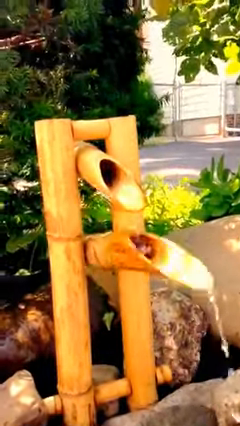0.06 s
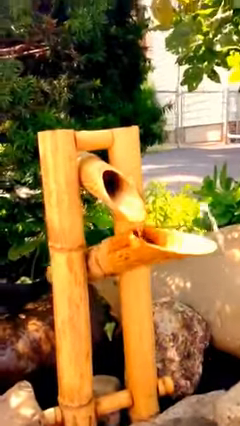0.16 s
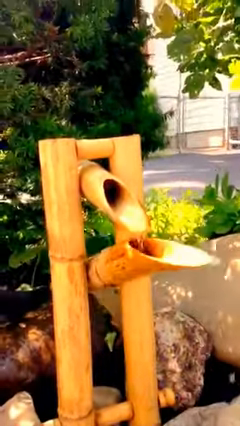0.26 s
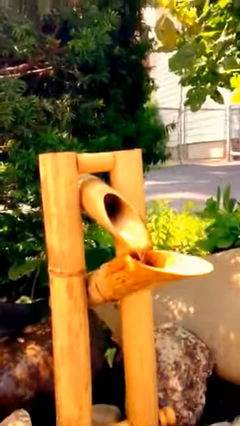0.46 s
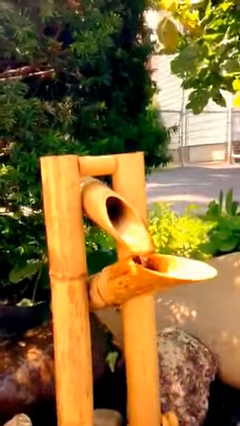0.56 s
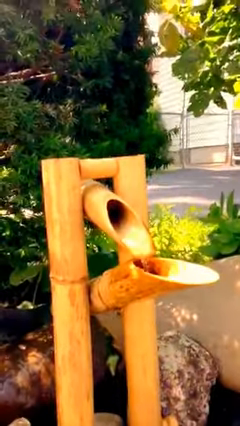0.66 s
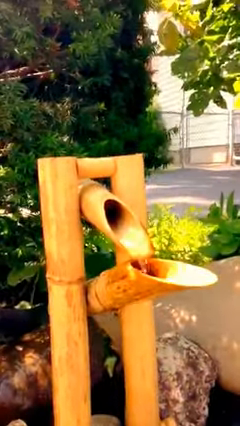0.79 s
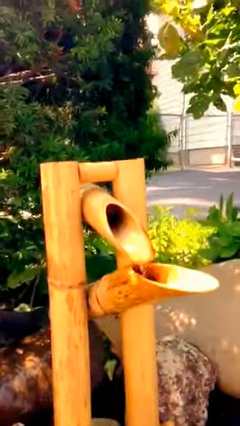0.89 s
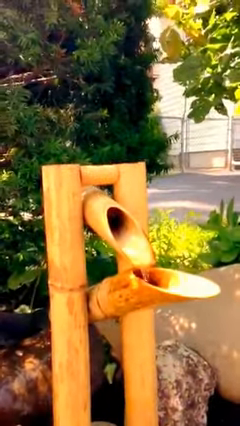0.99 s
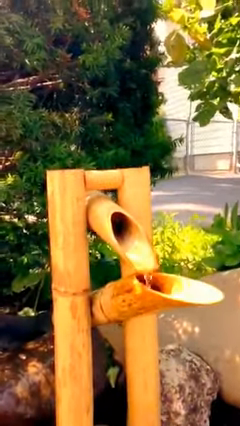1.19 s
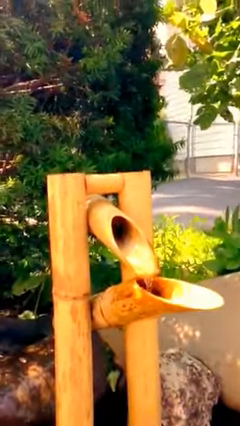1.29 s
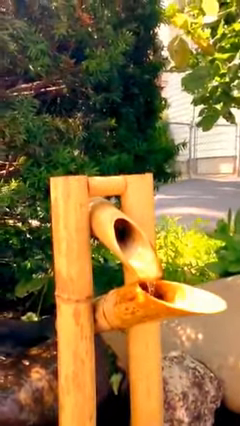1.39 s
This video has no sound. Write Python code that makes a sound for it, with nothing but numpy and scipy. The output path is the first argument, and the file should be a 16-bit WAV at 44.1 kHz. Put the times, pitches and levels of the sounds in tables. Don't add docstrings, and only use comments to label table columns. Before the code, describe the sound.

One hard, dry bamboo clack with a tiny squeaky rattle, then soft dripping and trickling

```python
import sys
import numpy as np
from scipy import signal
from scipy.io import wavfile
from scipy.ndimage import uniform_filter1d

SR = 44100
rng = np.random.default_rng(int(sys.argv[2]) if len(sys.argv) > 2 else 0)


def to_wav(sig):
    pcm = np.clip(np.atleast_2d(sig), -1, 1) * 32767
    pcm = np.round(pcm).astype(np.int16)
    wavfile.write(sys.argv[1], SR, pcm.T)


def gain_from_db(level_db):
    decades = np.asarray(level_db, float) / 20
    return 10 ** decades


N = 63945

# t/s, force/dB, hardness/Hz
FOOT_CONTACTS = [(.2125, -12, 7000), (.2141, -5, 7000), (.2176, -6, 3500), (.2211, -11, 4240),
                 (.2248, -16, 3500), (.2272, -18, 3500), (.2320, -21, 3000), (.2415, -26, 2490),
                 (.2490, -36, 2450), (.4062, -34, 2500), (.4083, -28, 1800), (.4325, -22, 560),
                 (.4362, -25, 800), (.4458, -36, 2520), (.4495, -33, 880)]
# f/Hz, level/dB, t60/s
TUBE_MODES = [(212, -9, 0.033), (372, -10.5, 0.036), (596.4, -7.5, .05), (790, -9.5, 0.028),
              (854.7, 6, 0.034), (1136, -7, 0.049), (1333, -4, 0.036), (1442, -4.5, 0.032),
              (1714, -4.5, 0.053), (2142, -3.5, 0.057), (2940, -0.5, 0.022), (3630, -4, .033),
              (4780, 6.5, 0.0081), (6000, -26.5, .012)]
# t/s, level/dB
PIVOT_CHATTERS = [(.2254, -16), (.2310, -22), (.2385, -25.5), (0.243, -32), (.2465, -23), (.2495, -29),
                  (0.2517, -22.5), (.2588, -27.5), (.2610, -17.5), (0.264, -28), (0.269, -28), (.2750, -34),
                  (0.28, -24)]
# f/Hz, level/dB, t60/s
PIVOT_MODES = [(3100, -22, 0.0268), (3525, -6, 0.027), (4050, -6.5, 0.0089), (5000, -30, 0.026)]
# t/s, peak/dB, f/Hz, t60/s
AXLE_SQUEAKS = [
    (.2400, -32, 3520, 0.058),
    (.2500, -35, 3530, 0.027),
    (.2588, -26.5, 3447, 0.036),
    (.2588, -21.5, 3004, 0.019),
    (.2700, -43, 3447, 0.062),
]
# t/s, peak/dB, centre f/Hz, broad part/dB
DROP_SPLATS = [(0.0298, -42.5, 8000, 2), (0.0573, -41.5, 14660, -10), (0.0817, -50, 6190, -9),
               (0.1052, -48, 7570, -6), (0.1264, -57, 8080, -5), (0.1394, -54, 14300, -7),
               (0.1516, -44, 8700, -7), (0.182, -37, 6300, -7), (0.1864, -38, 6350, -7),
               (0.3331, -38, 10350, -7), (0.3384, -41, 11800, -3), (0.3556, -37, 8300, -7),
               (0.382, -57, 7370, -15), (0.3864, -34.5, 7950, 6), (0.4469, -35, 10300, -21),
               (0.4514, -45, 11100, -12), (0.4624, -41, 9250, -7), (0.4948, -17, 9350, -2.5),
               (0.5014, -26, 8300, 2), (0.5154, -27, 8250, -3), (0.5457, -40.5, 6060, -3),
               (0.5524, -38, 6360, 3), (0.5726, -37.5, 8010, 3), (0.5824, -49, 8650, -17),
               (0.6285, -58, 7410, 1), (0.6784, -43, 6000, -15), (0.6883, -30, 10350, 1),
               (0.6944, -36, 10600, -2), (0.7054, -36, 10000, 7), (0.7327, -42.5, 6310, -5),
               (0.7814, -40, 8650, -5), (0.8091, -51, 7500, -9), (0.831, -55, 7130, -5),
               (0.8784, -32, 13300, 12), (0.8829, -18.5, 13040, -3.5), (0.9208, -48, 12130, -4),
               (0.9208, -36.5, 6000, 2), (0.9404, -45, 12900, -7), (1.0829, -46, 9800, -10),
               (1.1338, -44, 8900, 7), (1.1648, -27.5, 13000, -6), (1.1932, -25, 9240, 3),
               (1.2351, -45, 10400, -5), (1.2545, -42, 8400, 15), (1.3109, -41.5, 9300, -7),
               (1.3284, -42.5, 8130, -14), (1.3578, -43, 9410, -7), (1.3748, -51, 9450, -5),
               (1.3912, -42, 9440, -7), (1.4152, -43, 5800, -38)]
# t/s, peak/dB, f/Hz, t60/s
SMALL_BUBBLES = [(.0323, -45, 2710, 0.044), (.0653, -47, 2910, 0.032), (.1062, -43, 5470, 0.024),
                 (.1184, -42, 7640, 0.014), (.1271, -45, 2490, 0.08), (.1401, -40, 2130, 0.035),
                 (.1415, -41.5, 3640, 0.019), (.1825, -40, 2860, 0.024), (.2734, -37.5, 6450, 0.017),
                 (.3341, -38.5, 4060, 0.015), (.4584, -44, 5570, 0.016), (.4693, -40.5, 2780, 0.021),
                 (.4850, -42, 5970, 0.026), (.4865, -41, 4050, 0.022), (.5457, -51, 4260, 0.1),
                 (.6419, -47, 7370, 0.031), (.6784, -47, 4430, 0.023), (.6913, -41, 3920, 0.013),
                 (.7058, -40.5, 4050, 0.021), (.7711, -43.5, 6460, 0.013), (.7816, -41, 4350, 0.016),
                 (.9208, -41, 2200, 0.011), (1.0256, -45.5, 3060, 0.03), (1.1937, -45.5, 3390, 0.032),
                 (1.2074, -36, 3830, 0.0048), (1.274, -39, 4000, 0.019), (1.3009, -43, 2900, 0.009),
                 (1.3753, -44, 2710, 0.012), (1.409, -46.5, 3270, 0.091), (1.4152, -41, 6000, 0.031)]
# t/s, peak/dB, f/Hz, t60/s
LARGE_BUBBLES = [(.034, -41.5, 1330, 0.033), (.183, -36.5, 1410, 0.024), (.189, -41, 926, 0.042),
                 (.340, -43.5, 804, 0.073), (.388, -45.5, 832, 0.21), (.735, -43.5, 952, 0.056),
                 (.825, -43.5, 1366, 0.032), (.8845, -32.5, 839, 0.075), (1.115, -50, 943.7, 0.24),
                 (1.138, -44.5, 972, 0.072)]
# t/s, level/dB
TRICKLE_FLOW = [(0.0, -53), (0.214, -62), (0.35, -54.5), (0.48, -59.5), (0.976, -60.5), (1.45, -57)]
# f/Hz, density/dB per Hz
HISS_SPECTRUM = [(880, -33), (1500, 0), (2550, -6), (4140, -3), (6970, -20.5), (9470, -9), (14300, -28.5),
                 (15800, -2)]
# t/s, level/dB
HUM_SWELL = [(0.0, -55.5), (0.302, -52.5), (0.48, -59), (0.876, -59.5), (1.45, -57.5)]
# f/Hz, density/dB per Hz
HUM_SPECTRUM = [(40, -22), (70, -21), (110, -9), (180, -2), (250, -2.5), (330, -16.5), (500, -17)]
# f/Hz, density/dB per Hz
GARDEN_SPECTRUM = [(450, -26), (600, -5.5), (950, 1), (1500, -9.5), (2400, -21), (3500, -30)]


def tube():
    mode_scatter_db = 6.5
    settle_s, settle_db, settle_time_s = .2226, -12, .0015
    out, t = np.zeros(N), np.arange(SR // 4) / SR
    for s, force_db, hard_hz in FOOT_CONTACTS:
        push = butter(1. * (t == 0), hard_hz, "low")
        scatter_db = mode_scatter_db * rng.standard_normal(len(TUBE_MODES))
        noise = rng.standard_normal((2, len(t)))
        body = np.zeros(len(t))
        for (hz, mode_db, t60_s), extra_db in zip(TUBE_MODES, scatter_db):
            body += gain_from_db(mode_db + extra_db - 15) * ring(push, hz, t60_s)
        settled = np.clip((s + t - settle_s) / settle_time_s, 0, 1) * (s < settle_s)
        crack = butter(noise[0] * fade(t, .0098), [700, 6600], "band", order=1)
        crack = gain_from_db(-3.5) * butter(crack, 2 * hard_hz, "low")
        echo = gain_from_db(-26.5) * butter(noise[1] * fade(t, .19), [500, 4000], "band")
        add(out, s, gain_from_db(force_db) * (body * gain_from_db(settle_db * settled) + crack + echo))
    return out


def pivot():
    chatter_t60_s, buzz_db, buzz_smooth_s = .0055, -23.5, .004
    shake, t = np.zeros(N), np.arange(SR // 30) / SR
    for s, level_db in PIVOT_CHATTERS:
        add(shake, s, gain_from_db(level_db - 17.5) * fade(t, chatter_t60_s))
    noise = rng.standard_normal((2, N))
    chatter = noise[0] * shake
    buzz = noise[1] * uniform_filter1d(shake, int(buzz_smooth_s * SR))
    modes = sum(gain_from_db(mode_db) * ring(chatter, hz, t60_s) for hz, mode_db, t60_s in PIVOT_MODES)
    return modes + gain_from_db(buzz_db + 34) * butter(buzz, [4000, 11000], "band")


def squeaks():
    return bubbles(AXLE_SQUEAKS, attack_s=.0015, rise_per_s=0, wobble=.32)


def splats():
    attack_s, snap_t60_s, rise_s = .0003, .0026, .00051
    spray_db, spray_t60_s = -23, .045
    width, body_db, body_low_hz = .27, -4, 4000
    out, t = np.zeros(N), np.arange(SR // 12) / SR
    envelope = fade(t, snap_t60_s) + gain_from_db(spray_db) * fade(t, spray_t60_s)
    envelope = envelope * (1 - np.exp(-t / attack_s))
    for s, peak_db, hz, broad_db in DROP_SPLATS:
        burst = rng.standard_normal(len(t)) * envelope
        narrow = butter(burst, [hz * (1 - width / 2), hz * (1 + width)], "band")
        broad = gain_from_db(body_db + broad_db) * butter(burst, body_low_hz, "high", order=3)
        snap = narrow + broad
        add(out, s + rise_s, gain_from_db(peak_db) * snap / np.abs(snap).max())
    return out


def bubbles(table, attack_s, rise_per_s, wobble):
    out, t = np.zeros(N), np.arange(SR // 6) / SR
    for s, peak_db, hz, t60_s in table:
        shake = wobble * rms_one(butter(rng.standard_normal((2, len(t))), hz / 12, "low"))
        phase = 2 * np.pi * hz * t * (1 + rise_per_s * t / 2) + shake[1]
        tone = (1 + .5 * shake[0]) * np.sin(phase)
        add(out, s, gain_from_db(peak_db) * (1 - np.exp(-t / attack_s)) * fade(t, t60_s) * tone)
    return out


def trickle():
    fizz_db, ticks_db, hiss_db, hiss_flow_share = -61, -67, -4, .24
    s, db = np.transpose(TRICKLE_FLOW)
    swing_db = np.interp(np.arange(N) / SR, s, db - db.mean())
    fizz = dealt_rings(grains(320, spread_db=1), np.geomspace(1300, 9000, 24), cycles=23)
    ticks = dealt_rings(grains(700, spread_db=4.5), np.geomspace(3500, 14500, 14), cycles=24)
    drops = gain_from_db(fizz_db) * fizz + gain_from_db(ticks_db) * butter(ticks, 2000, "high")
    hiss_level = gain_from_db(db.mean() + hiss_db + hiss_flow_share * swing_db)
    return gain_from_db(swing_db) * drops + hiss_level * banded_noise(HISS_SPECTRUM, patchy_db=1.8)


def grains(rate_per_s, spread_db):
    sizes = gain_from_db(spread_db * np.minimum(rng.exponential(1, N), 4)) * rng.choice([-1, 1], N)
    return sizes * (rng.random(N) < rate_per_s * gain_from_db(4 * drift(12)) / SR)


def dealt_rings(clicks, pitches_hz, cycles):
    dealt, out = rng.integers(0, len(pitches_hz), N), np.zeros(N)
    for k, hz in enumerate(pitches_hz):
        once = ring(clicks * (dealt == k), hz, cycles / hz)
        out += hz * ring(once, hz, cycles / hz / 2)
    return rms_one(out)


def garden():
    hum_db, wash_db = -2.5, -60
    s, db = np.transpose(HUM_SWELL)
    hum_level = gain_from_db(hum_db + np.interp(np.arange(N) / SR, s, db))
    hum = hum_level * banded_noise(HUM_SPECTRUM, patchy_db=1.5)
    return hum + gain_from_db(wash_db) * banded_noise(GARDEN_SPECTRUM, patchy_db=1.5)


def banded_noise(spectrum, patchy_db):
    out, together = np.zeros(N), drift(3)
    edges_hz = 40 * 2 ** np.arange(0, 9, 1 / 3)
    white = rng.standard_normal((2, N))
    at_hz, db = np.transpose(spectrum)
    for k, (low, high) in enumerate(zip(edges_hz, edges_hz[1:])):
        level_db = np.interp(np.log(low * high) / 2, np.log(at_hz), db, left=-60, right=-60)
        flicker_db = patchy_db * (.5 * together + drift(19))
        out += gain_from_db(level_db + flicker_db) * butter(white[k % 2], [low, high], "band")
    return rms_one(out)


def drift(rate_hz):
    r = np.exp(-80 * np.pi * rate_hz / SR)
    slow = signal.lfilter([1], [1, -2 * r, r * r], rng.standard_normal(N // 40 + 2002))[2000:]
    return np.interp(np.arange(N) / 40, np.arange(len(slow)), rms_one(slow))


def ring(clicks, hz, t60_s):
    r, w = gain_from_db(-60 / (t60_s * SR)), 2 * np.pi * hz / SR
    return signal.lfilter([0, np.sin(w)], [1, -2 * r * np.cos(w), r * r], clicks + 1e-18)


def fade(t, t60_s):
    return np.exp(-np.log(1000) * t / t60_s)


def butter(x, hz, kind, order=2):
    edges_hz = np.clip(hz, 20, .45 * SR)
    return signal.sosfilt(signal.butter(order, edges_hz, kind, fs=SR, output="sos"), x)


def rms_one(x):
    return x / np.sqrt(np.mean(x ** 2) + 1e-20)


def add(out, s, grain):
    i = int(s * SR)
    out[i:i + len(grain)] += grain[:N - i]


def scene():
    small = bubbles(SMALL_BUBBLES, attack_s=.00012, rise_per_s=5.3, wobble=.45)
    large = bubbles(LARGE_BUBBLES, attack_s=.00122, rise_per_s=.62, wobble=.2)
    knock = butter(tube(), 205, "high", order=4)
    mix = knock + pivot() + splats() + small + large + trickle() + garden() + squeaks()
    return mix[None]


def low_pass(x):
    return signal.sosfilt(signal.butter(12, 16490, fs=SR, output="sos"), x)


def record(dry):
    bass_cut = butter(dry, 93, "high")
    top_cut = signal.cheby2(10, 35, 15900, fs=SR, output="sos")
    mix = signal.sosfilt(top_cut, bass_cut)
    return low_pass(mix)


dry = scene()
out = record(dry)
to_wav(out)
```